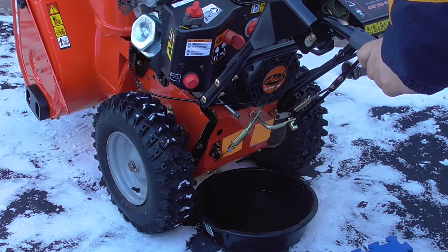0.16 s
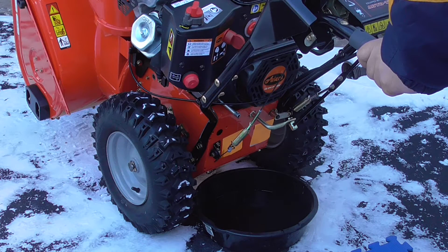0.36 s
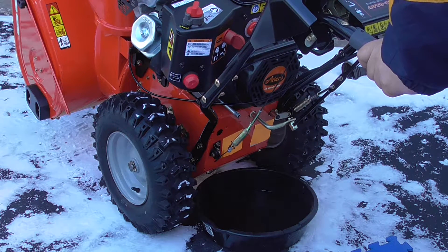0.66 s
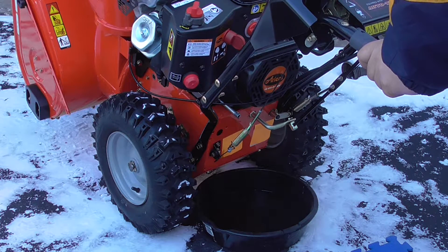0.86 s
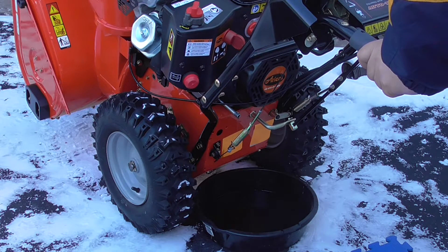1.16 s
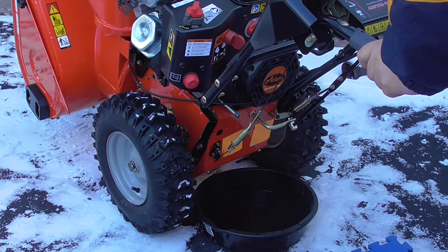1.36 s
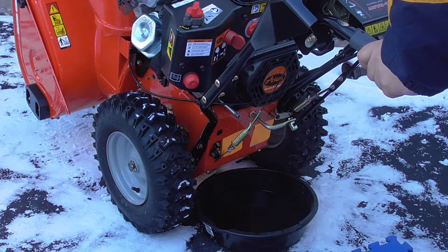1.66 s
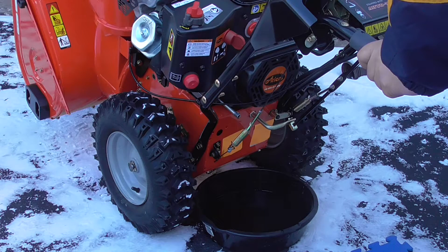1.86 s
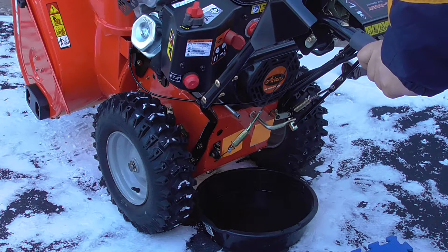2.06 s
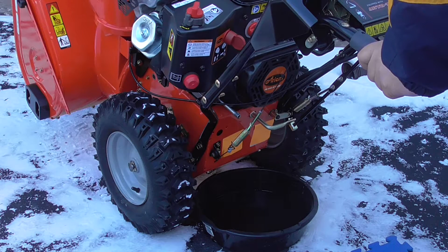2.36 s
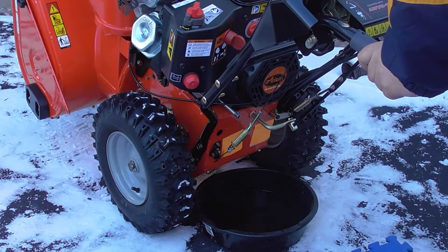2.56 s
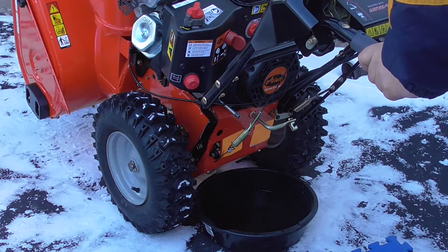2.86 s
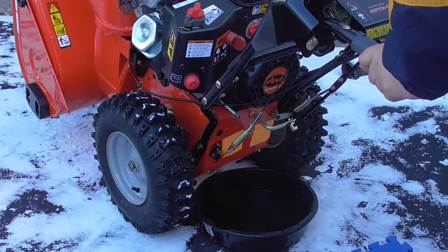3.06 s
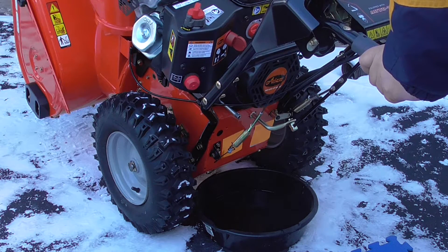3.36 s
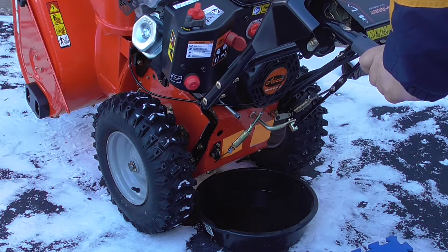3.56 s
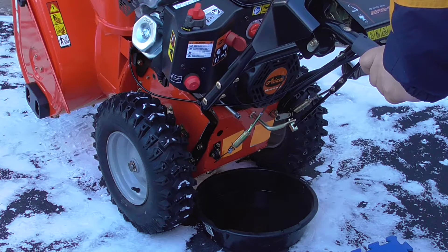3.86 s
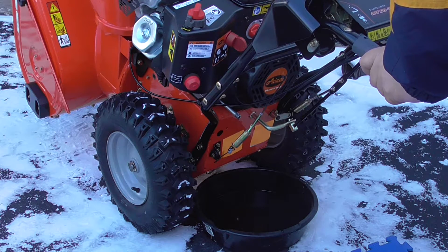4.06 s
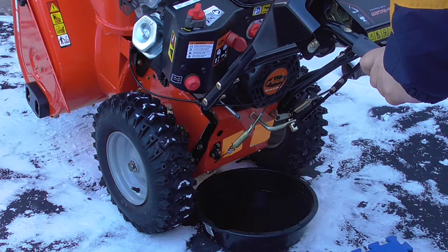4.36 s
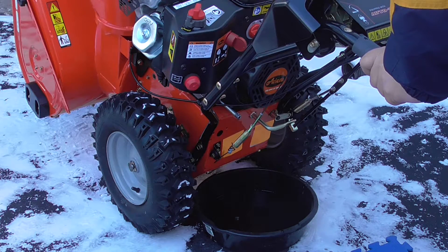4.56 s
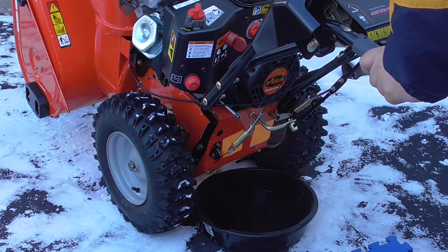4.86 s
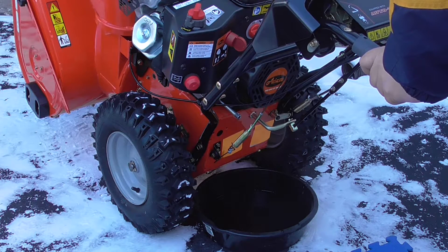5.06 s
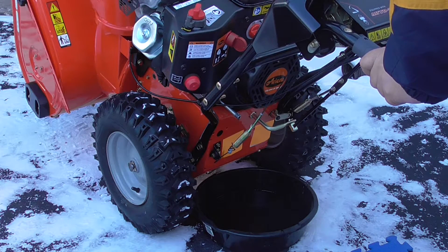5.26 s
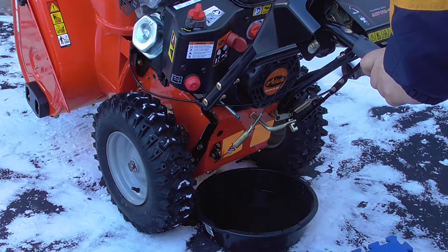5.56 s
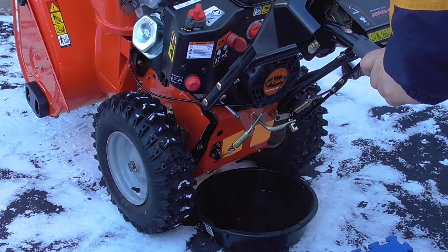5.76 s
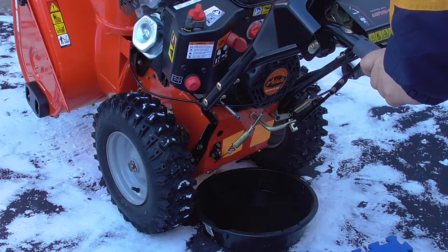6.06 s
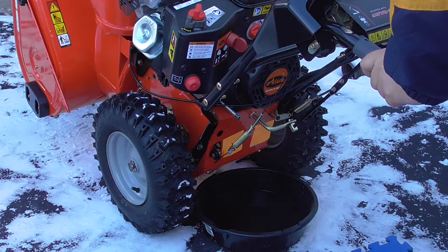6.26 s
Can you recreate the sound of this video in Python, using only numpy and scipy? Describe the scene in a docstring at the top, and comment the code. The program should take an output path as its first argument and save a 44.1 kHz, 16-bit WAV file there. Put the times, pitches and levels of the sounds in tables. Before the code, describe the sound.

A quiet outdoor place with soft far rumble and thin, steady hiss. From 0 to 0.45 s wind buffets the stereo microphone in lumpy low thumps, strongest around 0.2 s with a slight brighter flap. A tiny liquid tick comes at 0.63 s, then the first heavy oil drop knocks on the hollow pan at 0.85 s. Another wind puff bumps at 1.18 s, followed by a calm gap. Drops fall at 2.5 s, the loudest, then 2.93, 3.22, a duller one at 3.57, 4.05, and a weak dull one at 4.33 s. After a pause with small low puffs, the last lands at 5.44 s. Each is a short, dull mid-pitched plunk with faint low pan ringing, clustered quick echoes and a little bright spray; several trail softer droplets a tenth of a second later. Light wind returns from 6.06 s, with a firmer puff at 6.4 s.

```python
"""Oil drops on a pan, outdoors in light wind

Heavy drops knock on a hollow pan: clicks ring a dull knock and the modes of the pan, with a little bright spray.
Each knock returns from the ground and nearby walls in the same pattern of echoes.
Wind buffets the two microphone ports: lumpy low noise in gusts, short swirls as puffs, one brighter flap.
Behind lie a far town rumble and the microphone's hiss, both shaped noise, and a faint tone from the electronics."""
import sys
import numpy as np
from scipy import signal
from scipy.io import wavfile

SR = 44100
rng = np.random.default_rng(int(sys.argv[2]) if len(sys.argv) > 2 else 0)


def elevation(decibels):
    """Turn decibel levels (scalar or array-like) into linear amplitude ratios."""
    levels = np.asarray(decibels, float)
    return 10 ** (levels / 20)


def unload_audio(sound):
    """Save the sound as a 16-bit wav file, at the path given as the first command line argument."""
    columns = np.transpose(np.atleast_2d(sound))
    # keep every value between -1 and 1, then stretch to whole-number steps
    steps = np.round(np.clip(columns, -1, 1) * 32767)
    wavfile.write(sys.argv[1], SR, steps.astype(np.int16))


N = 282901

# Far rumble and hiss, spectrum shape before the overall level is set: pitch_hz, density_db (per Hz)
FLOOR_SHAPE = [(20, -38), (30, -9), (53, -6), (166, -1), (274, -2), (492, -9), (882, -13), (1200, -18.5),
               (1450, -29.5), (1820, -27.5), (2690, -37), (4000, -31), (6000, -36), (8500, -32.5),
               (12800, -34), (15500, -37)]
FLOOR_RMS_DB = -50.5
# Left-right likeness of rumble and hiss: pitch_hz, likeness (1 = same in both ports)
FLOOR_LIKENESS = [(60, 0.82), (200, 1), (400, 0.74), (800, 0.48), (1500, 0), (3000, 0.27), (8000, .0),
                  (15000, 0.22)]
# The deepest rumble grows and sinks; only the departure from the mean counts: time_s, level_db
DEEP_SWELL = [(0.0, -60), (0.68, -67), (4.16, -74), (4.43, -66.5), (6.41, -62)]
DEEP_BELOW_HZ = 70

# Gusts on the ports: start_s, length_s, level_db (rms)
GUSTS = [(0.0, 0.39, -43), (1.133, 0.17, -47.5), (1.852, 0.16, -61.5), (3.156, 0.34, -56),
         (4.43, 0.18, -56), (4.803, 0.063, -58), (5.342, 0.38, -57.5), (6.06, 0.43, -52.5)]
CALM_DB, GUST_EDGE_DB_PER_S = -70.5, 162
# Firm puffs, level at the top of the bell: time_s, level_db (rms), centre_hz, left_over_right_db
FIRM_PUFFS = [(0.052, -31.5, 201, -5.5), (0.097, -30, 120, -4.5), (0.14, -35.5, 175, -3),
              (0.19, -23.5, 148, -3), (0.222, -22, 168.4, -1.5), (0.267, -34, 125, -6),
              (0.319, -29, 154, -4.5), (0.404, -34.5, 99, 2), (1.182, -30.5, 133, -3.5),
              (3.382, -46, 129, 2.5), (4.455, -42.5, 82.5, -4), (4.652, -40, 88, -5.5),
              (4.815, -42, 107, 0), (4.846, -36, 141, -6), (5.34, -45, 90.5, 9), (5.69, -42, 95, 1),
              (6.071, -44.5, 157, 4), (6.126, -43, 95, 0), (6.291, -38.5, 107, 6.5),
              (6.403, -29.5, 116, -2.5)]
# Distance from the top of a puff to an eighth of its height; only puffs above the reference last longer
PUFF_MS, PUFF_REF_DB, PUFF_MS_PER_DB = 25.9, -31, 0.5
# Lesser puffs at random: spacing, mean level over the gust and its spread, centre pitch and its spread, side spread
EDDY_GAP_S, EDDY_DB, EDDY_SPREAD_DB = 0.07, 3, 5
EDDY_HZ, EDDY_OCTAVES, EDDY_SIDE_DB = 95, 0.35, 1
# The strongest puff flaps with a brighter edge: time_s, level_db (rms at the top), length_ms, low_hz, high_hz
PORT_FLAP = (.213, -49, 10, 600, 1300)

# A small splash and its rebound: time_s, level_db
SPLASH_TICKS = [(.6256, -53.5), (0.6342, -57)]
# Ring of the splash: pitch_hz, level_db (on top of the tick), t60_s
SPLASH_RING = [(1240, 3.5, .015), (3180, 0, 0.012), (4600, -1, .005)]

# Drops on the pan: time_s, level_db (before echoes), sharpness_db, droplets_db (trailing droplets against the drop)
DROPS = [(0.85, -23, 0, -28), (2.5022, -21.5, 0, -12), (2.9285, -25, -1, -12), (3.2238, -24, -0.5, -15),
         (3.5655, -27.5, -16, -34), (4.0494, -23, -0.5, -21), (4.3273, -32, -17, -45),
         (5.4357, -24, -0.5, -19.5)]
# The thread of oil behind a drop breaks into droplets that land later and softer: delay_s, level_db
DROPLETS = [(.0835, -1), (.108, -7.5), (.141, -9.5)]
DROPLET_SHARP_DB = -22
SHARP_ABOVE_HZ = 1300  # sharpness counts per octave above this
# The knock is a click through two damped resonances in a row: pitch_hz, t60_s
KNOCK = [(585, 0.015), (750, 0.0068)]
CONTACT_HZ = 1400  # oil lands softly: the knock is dulled above this
# Further modes of the pan: pitch_hz, level_db (against the drop), t60_s
PAN_MODES = [(156.5, -16.5, 0.52), (192.5, -11.5, 0.1), (222.3, -20.5, 0.56), (260.4, -14, 0.15),
             (278.6, -18, 0.4), (351.7, -22.5, 0.29), (409, -24, 0.87), (434, -30, 0.9), (925, -21, 0.027),
             (930, -14, 0.021), (1085, -20, 0.018), (1183, -14, 0.022), (1325, -22, 0.042),
             (1380, -20, 0.033), (1874, -17, 0.0056), (2406, -27.5, 0.017)]
MODE_SIDE_DB = 1  # low modes radiate to alternate sides
# Near paths from pan to microphone: delay_ms, level_db
NEAR_ECHOES = [(0, -3.6), (2.47, -6), (7.12, 0), (12.04, -6), (17.62, -14), (23.04, -12.5), (36.94, -11),
               (42.97, -9), (53.61, -13), (64.33, -17.5)]
# Far paths: first delay, spacing before scatter, first level, loss with delay, unevenness
FAR_MS, FAR_GAP_MS = 47, 8.3
FAR_DB, FAR_LOSS_DB_PER_MS, FAR_UNEVEN_DB = -18.5, 0.94, -1.5
# Spray off each impact: low_hz, high_hz, level_db (before sharpness), t60_s
SPRAY_BANDS = [(1550, 2660, -31.5, 0.2), (3170, 7900, -35, 0.13), (7800, 12300, -44.5, 0.041)]
# What the rough walls scatter, the same for every drop: shared by both ports, then opposite in them
WALL_SCATTER = rng.standard_normal((2, SR // 3))
LOW_CUT_HZ = 38


def rms_one(x):
    """Scale to unit rms."""
    return x / np.sqrt(np.mean(x ** 2) + 1e-20)


def at_hz(points, hz):
    """Read a table on a log-frequency axis."""
    table_hz, values = np.transpose(points)
    return np.interp(np.log(hz), np.log(table_hz), values)


def band(x, low_hz, high_hz):
    """Butterworth band-pass."""
    return signal.sosfilt(signal.butter(2, [low_hz, high_hz], "band", fs=SR, output="sos"), x)


def drift(rate_hz):
    """Slow random wander of unit rms: noise through two equal poles, drawn at every 40th sample."""
    r = np.exp(-80 * np.pi * rate_hz / SR)
    noise = rng.standard_normal(N // 40 + 2002)
    slow = signal.lfilter([1], [1, -2 * r, r * r], noise)[2000:]  # skip the settling
    return np.interp(np.arange(N) / 40, np.arange(len(slow)), rms_one(slow))


def ring(clicks, hz, t60):
    """A damped resonance: a unit click starts a sine of height 1 that falls 60 dB in t60 seconds."""
    r, w = elevation(-60 / (t60 * SR)), 2 * np.pi * hz / SR
    return signal.lfilter([0, np.sin(w)], [1, -2 * r * np.cos(w), r * r], clicks + 1e-18)


def clicks_at(s, db, size=N):
    """Single-sample clicks at the given seconds and levels."""
    out = np.zeros(size)
    out[np.round(np.asarray(s) * SR).astype(int)] = elevation(db)
    return out


def background():
    """Far rumble and hiss: 0.4-octave bands of stereo noise; the rumble wavers slowly, the hiss stays even."""
    edges = 22 * 2 ** np.arange(0, 9.7, 0.4)
    white = rng.standard_normal((2, 2, N))
    deep_db = np.interp(np.arange(N) / SR, *np.transpose(DEEP_SWELL))
    out = 0
    for k, (low, high) in enumerate(zip(edges, edges[1:])):
        mid, side = band(white[k % 2], low, high)  # neighbouring bands use separate noise
        hz = np.sqrt(low * high)
        alike = np.clip(at_hz(FLOOR_LIKENESS, hz), -1, 1)
        waver_db = (hz < 1800) * 2.04 * drift(2.7)
        swell_db = (hz < DEEP_BELOW_HZ) * (deep_db - deep_db.mean())
        gain = elevation(at_hz(FLOOR_SHAPE, hz) + waver_db + swell_db)
        out = out + gain * (np.sqrt(1 + alike) * mid + np.sqrt(1 - alike) * side * [[1], [-1]])
    return elevation(FLOOR_RMS_DB) * rms_one(out)


def whine():
    """Two faint traces of the electronics: a steady sine and a narrow band of hiss."""
    tone = elevation(-91.5) * np.sin(2 * np.pi * 7972 * np.arange(N) / SR)
    hiss = rms_one(band(rng.standard_normal((2, N)), 12400, 13100))
    return tone + elevation([[-86.0], [-80.0]]) * hiss


def gust_db(s):
    """Wind level over time: calm, lifted by each gust with edges sloping in dB."""
    levels = []
    for start, length, db in GUSTS:
        outside = np.maximum(np.maximum(start - s, s - start - length), 0)  # seconds away from the gust
        levels.append(np.maximum(db - GUST_EDGE_DB_PER_S * outside, CALM_DB))
    return np.max(levels, axis=0)


def ports(push, own, own_db):
    """Wind pushes the two ports in opposite directions; each port adds eddies of its own."""
    return push * [[1], [-1]] + elevation(own_db) * own


def wind():
    """Lumpy low noise between the puffs, following the gusts."""
    low = band(band(rng.standard_normal((3, N)), 39, 137), 25, 510)
    lumps = elevation(gust_db(np.arange(N) / SR) + 4.5 * drift(28))
    return lumps * ports(rms_one(low[0]), rms_one(low[1:]), own_db=-5.0)


def eddies(count):
    """Rows like the firm puffs, drawn at random; their level follows the gusts."""
    when = rng.random(count)
    level, pitch, side = rng.standard_normal((count, 3)).T
    s = EDDY_GAP_S * (np.arange(count) + when)
    db = gust_db(s) + EDDY_DB + EDDY_SPREAD_DB * level
    hz = EDDY_HZ * 2 ** (EDDY_OCTAVES * pitch)
    return np.transpose([s, db, hz, EDDY_SIDE_DB * side])[s < N / SR]


def puffs():
    """Each puff is a short, firm swirl of narrow noise under a bell-shaped envelope, with a breathy top."""
    out = np.zeros((2, N + SR))  # half a second spare at both ends
    t = np.arange(-SR // 8, SR // 8) / SR
    rows = np.vstack([FIRM_PUFFS, eddies(count=100)])
    white = rng.standard_normal((len(rows), 3, len(t)))
    for (s, db, hz, pan_db), noise in zip(rows, white):
        ms = PUFF_MS + PUFF_MS_PER_DB * max(db - PUFF_REF_DB, 0)
        bell = np.exp(-np.log(2) * 3 * (t * 1000 / ms) ** 2)
        swirl = band(noise, 0.678 * hz, 1.28 * hz)
        strength = np.abs(signal.hilbert(swirl))
        swirl = swirl / (strength + 0.27 * swirl.std()) ** 0.84  # one eddy: nearly steady strength
        top = band(band(noise, 2.3 * hz, 3.73 * hz), 2.1 * hz, 2.64 * hz)
        swirl = rms_one(swirl) + elevation(-18.0) * rms_one(top) * bell
        at = round(s * SR) + SR // 2 - SR // 8
        sides = elevation(db + np.array([[pan_db], [-pan_db]]) / 2)
        out[:, at:at + len(t)] += sides * bell * ports(swirl[0], swirl[1:], own_db=-7.0)
    return out[:, SR // 2:SR // 2 + N]


def flap():
    """The strongest puff flaps: a short dull noise burst under a bell-shaped envelope."""
    s, db, ms, low_hz, high_hz = PORT_FLAP
    bell = np.exp(-2 * ((np.arange(N) / SR - s) * 1000 / ms) ** 2)
    noise = band(band(rng.standard_normal((2, N)), low_hz, high_hz), low_hz, high_hz)
    return elevation(db) * bell * rms_one(noise)


def splash():
    """A light tick of liquid: two clicks ring three short resonances."""
    s, db = np.transpose(SPLASH_TICKS)
    return sum(ring(clicks_at(s, db + ring_db), hz, t60) for hz, ring_db, t60 in SPLASH_RING)


def impacts():
    """Times, levels and sharpness of all drops and their droplets."""
    main = [row[:3] for row in DROPS]
    trail = [(s + delay, db + trail_db + loss_db, DROPLET_SHARP_DB)
             for s, db, _, trail_db in DROPS for delay, loss_db in DROPLETS]
    return np.transpose(main + trail)


def all_paths(count):
    """Near echoes, then far ones at uneven spacing, fading with distance."""
    chance = rng.uniform(-0.83, 1, (count, 2))
    ms = FAR_GAP_MS * (np.arange(count) + 0.32 * chance[:, 0])
    db = FAR_DB - FAR_LOSS_DB_PER_MS * ms + FAR_UNEVEN_DB * chance[:, 1]
    return np.vstack([NEAR_ECHOES, np.transpose([FAR_MS + ms, db])])


def yard(hz, echoes, lag_ms, loss_db, scatter_db, scatter_t60, alike_hz):
    """Echoes in both ports at one pitch: treble fades faster with distance, rough walls add scatter."""
    ms, db = np.transpose(echoes)
    t = np.arange(SR // 3) / SR
    fade_db_per_s = 10 * loss_db * max(np.log2(hz / 600), 0)  # loss_db: per octave and 0.1 s
    arrival = [(ms + lag_ms * ear * np.sin(ms)) / 1000 for ear in (0, 1)]  # paths come from different sides
    paths = np.array([clicks_at(s, db - fade_db_per_s * s, size=len(t)) for s in arrival])
    tail = elevation(scatter_db - 60 * t / scatter_t60 - fade_db_per_s * t)
    apart = hz / (hz + alike_hz)  # long waves reach both ports alike
    return paths + tail * (WALL_SCATTER[0] + apart * WALL_SCATTER[1] * [[1], [-1]])


def drops():
    """Every impact excites the same knock and modes; a sharper drop has more treble."""
    s, db, sharp_db = impacts()
    space = dict(echoes=all_paths(count=13), lag_ms=0.024, loss_db=9.0,
                 scatter_db=-34.5, scatter_t60=0.45, alike_hz=700)
    knock_hz = KNOCK[0][0]
    knock = clicks_at([0], [0], size=SR // 20)
    for hz, t60 in KNOCK:
        knock = ring(knock, hz, t60)
    knock = signal.sosfilt(signal.butter(2, CONTACT_HZ, fs=SR, output="sos"), knock)
    knock = knock / np.abs(knock).max()
    response = signal.fftconvolve(yard(knock_hz, **space), [knock], axes=1)
    out = signal.fftconvolve(response, [clicks_at(s, db)], axes=1)[:, :N]
    for k, (hz, mode_db, t60) in enumerate(PAN_MODES):
        treble_db = sharp_db * max(np.log2(hz / SHARP_ABOVE_HZ), 0)
        blows = clicks_at(s, db + mode_db + treble_db + rng.normal(0, 1.3, len(s)))
        # a second, short resonance: a mode takes a few cycles to build up
        swing = ring(ring(blows, hz, t60), hz, 3.48 / hz) * 4 * hz / SR
        if hz < knock_hz:  # low modes outlast the echoes, so they go without
            out += swing * elevation((-1) ** k * MODE_SIDE_DB * np.array([[1], [-1]]))
        else:  # modes above the knock pass through the echoes and swing in step with the knock
            out -= signal.fftconvolve(yard(hz, **space), [swing], axes=1)[:, :N]
    return band(out, 172, 9900) * elevation([[0.4], [-0.4]])


def spray():
    """Fine droplets fly off each impact: bands of bright noise that rise briefly and die away."""
    s, db, sharp_db = impacts()
    out = 0
    for low_hz, high_hz, spray_db, t60 in SPRAY_BANDS:
        fall = elevation(-60 / (t60 * SR))
        dying = signal.lfilter([1], [1, -fall], clicks_at(s, db + spray_db + 5.6 * sharp_db))
        dying = signal.lfilter([0.012], [1, -0.988], dying)  # the droplets take a moment to fly
        shared, own = rng.standard_normal(N), rng.standard_normal((2, N))
        out = out + dying * rms_one(band(shared + 0.75 * own, low_hz, high_hz))
    return out


def scene():
    """All sources at the microphone."""
    air = background() + whine() + wind() + puffs() + flap()
    return air + splash() + drops() + spray()


def low_pass(x):
    """Removes everything above the highest recorded frequency."""
    return signal.sosfilt(signal.butter(12, 15670, fs=SR, output="sos"), x)


def record(dry):
    """The microphone cuts the deepest bass."""
    low_cut = signal.butter(2, LOW_CUT_HZ, "high", fs=SR, output="sos")
    mix = signal.sosfilt(low_cut, dry)
    return low_pass(mix)


dry = scene()
out = record(dry)
unload_audio(out)
```